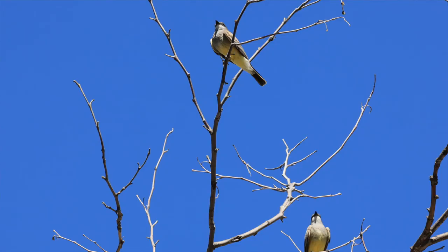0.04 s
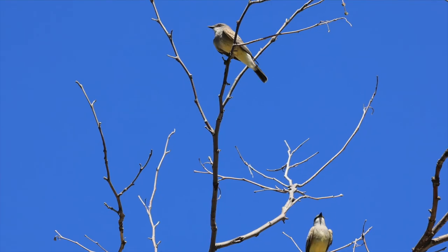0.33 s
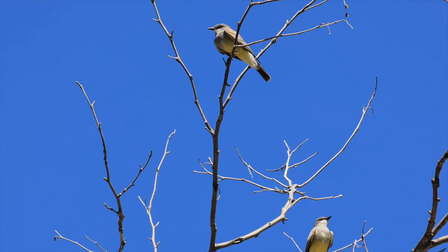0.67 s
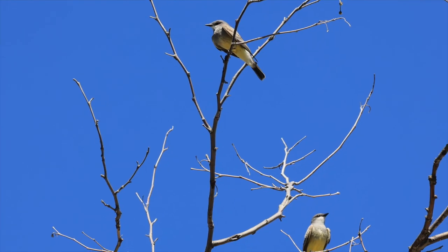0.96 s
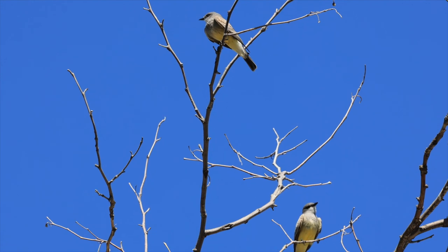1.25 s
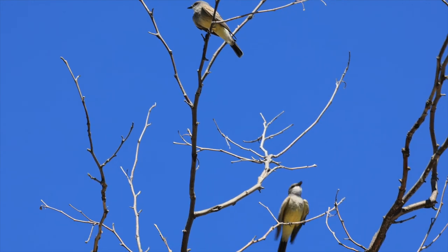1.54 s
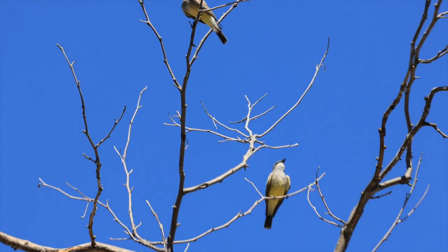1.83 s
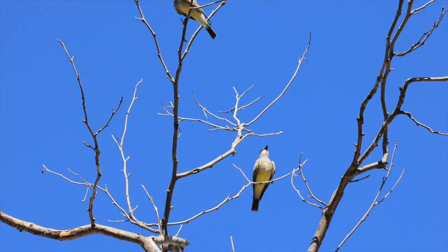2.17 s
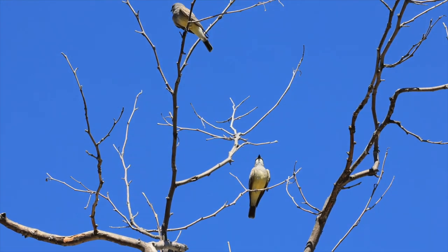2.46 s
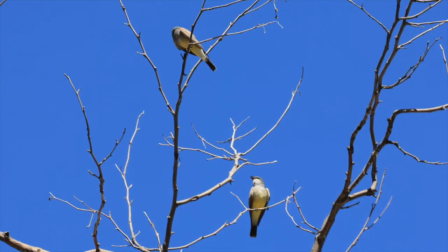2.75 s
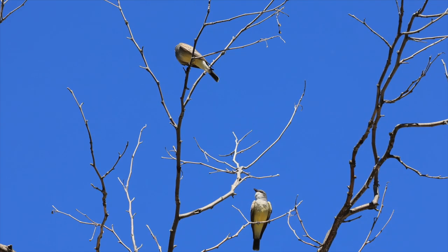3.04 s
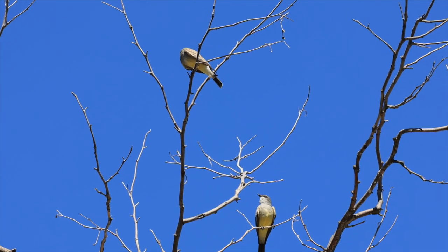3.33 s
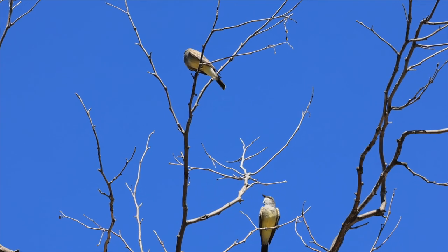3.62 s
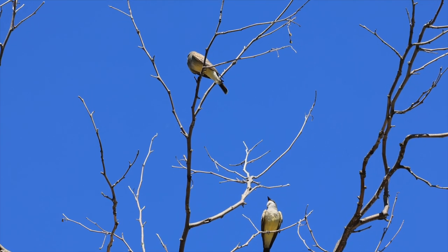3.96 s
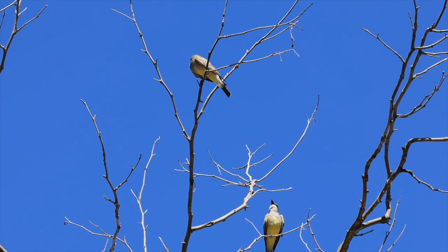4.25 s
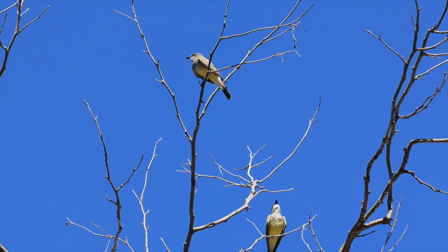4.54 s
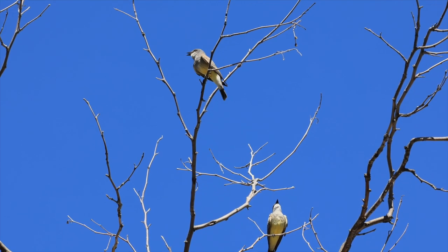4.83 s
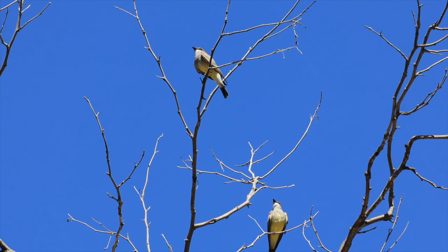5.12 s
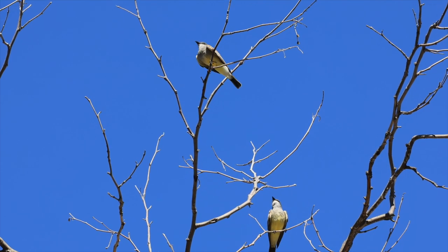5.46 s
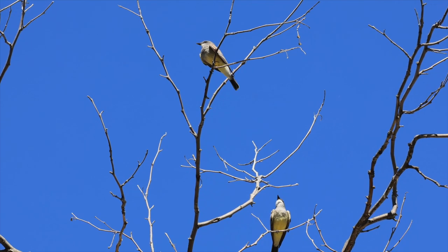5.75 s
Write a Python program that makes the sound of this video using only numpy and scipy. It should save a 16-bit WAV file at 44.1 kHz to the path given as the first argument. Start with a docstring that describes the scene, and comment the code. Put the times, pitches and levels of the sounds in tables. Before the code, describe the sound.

Birds give nasal falling whines, short chips and two quick bursts of sweeping, buzzy chatter outdoors, over distant traffic and a faint low hum.

```python
"""Kingbirds in a bare tree

Kingbirds give nasal falling whines, soft pips, trilled chips and two bursts of chatter (a rising trill,
two sweeps, a buzz), the first ending in a scream. Each note is one syrinx tone filtered by throat and
beak, with faint echoes. Small birds twitter and whistle far off, over distant traffic and a low hum.
The whole sound dips for about a second, and gain control lowers the background after each loud call."""
import sys
import numpy as np
from scipy import signal
from scipy.fft import rfft, irfft, next_fast_len
from scipy.io import wavfile
from scipy.ndimage import uniform_filter1d

SR = 44100
rng = np.random.default_rng(int(sys.argv[2]) if len(sys.argv) > 2 else 0)


def put_to_file(sound):
    """Save the sound as 16-bit audio at rate SR, in the file named by the first command-line argument."""
    columns = np.atleast_2d(sound).T  # one column per channel
    safe = np.clip(columns, -1, 1)
    whole_steps = np.round(safe * 32767)
    wavfile.write(sys.argv[1], SR, whole_steps.astype(np.int16))


N = 264159
TIME = np.arange(N) / SR
CHATTER_TRILL_HZ = 141.2

# Throat and beak response for pips and chips: f/Hz, gain/dB
CHIP_THROAT = [(900, -12), (1400, -6), (1900, 0.5), (2400, 4), (3000, 1.5), (3600, -6.5), (4200, -16),
               (4750, -26), (5500, -28.5), (6300, -41), (8000, -37), (9400, -20), (11000, -33),
               (12800, -25.5)]
# Spectrum of the low rumble: f/Hz, level/dB
RUMBLE_SPECTRUM = [(25, -20), (55, 5), (75, 9), (100, 3.5), (130, 10), (170, -2.5), (220, -10.5),
                   (400, -34.5)]


def undb(db):
    """Amplitude ratio of a level in decibels."""
    return 10 ** (np.asarray(db) / 20)


def shape(x, outline):
    """Zero-phase filtering by an outline (f/Hz, gain/dB), interpolated in log frequency."""
    size = next_fast_len(len(x) + 256)
    bins_hz = np.maximum(np.fft.rfftfreq(size, 1 / SR), 1)
    hz, db = np.transpose(outline)
    gain = undb(np.interp(np.log(bins_hz), np.log(hz), db))
    return irfft(rfft(x, size) * gain, size)[:len(x)]


def noise(spectrum):
    """Filtered Gaussian noise of unit rms."""
    x = shape(rng.standard_normal(N), spectrum)
    return x / x.std()


def walk(rate, size):
    """Smooth random modulation of spread near 1, with `rate` new values a second."""
    hold = max(int(SR / rate), 1)
    steps = np.repeat(rng.standard_normal(size // hold + 1), hold)
    return np.sqrt(2) * uniform_filter1d(uniform_filter1d(steps, hold), hold)[:size]


def clock(length):
    """Seconds since the onset of a note."""
    return np.arange(int(length * SR)) / SR


def arch(t, rise_s, from_hz, top_hz, to_hz):
    """Pitch contour that climbs, rounds off and falls ever faster."""
    up = np.clip(t / rise_s, 0, 1)
    down = np.clip((t - rise_s) / max(t[-1] - rise_s, 1 / SR), 0, 1)
    return from_hz + (top_hz - from_hz) * np.sin(np.pi / 2 * up) + (to_hz - top_hz) * down ** 1.4


def slacken(t, drop_s, share):
    """Falling membrane tension lowers the pitch by a share at the end of a note."""
    return 1 - share * np.clip(1 - (t[-1] - t) / drop_s, 0, 1) ** 1.49


def syrinx(start, hz, db, depth, trill_hz, throat, jitter, shimmer_db, rasp_db, attack_s=.002,
           release_s=.0017, overtones_db=0, cavity_hz=None):
    """Source and filter: a membrane's harmonics swell and fade as they cross the throat resonances."""
    t = TIME[:len(hz)]
    order = np.arange(1, 14)[:, None]
    flutter = lambda rate: walk(rate, SR)[:len(t)]
    # a second, slower vibration swings the pitch; depth and jitter are shares of the pitch
    trill_phase = 2 * np.pi * trill_hz * t + .22 * flutter(89)
    swing = np.cos(trill_phase) - .2 * np.sin(2 * trill_phase)  # lopsided, like a saw tooth
    hz = hz * (1 + depth * swing + jitter * flutter(900) + .0018 * flutter(63))
    harmonics = np.sin(2 * np.pi * order * np.cumsum(hz) / SR) * (order * hz < SR / 2)
    harmonics *= undb(overtones_db * np.log2(np.maximum(order / 3, 1)))  # per octave above the third
    if cavity_hz is not None:  # a moving resonance lifts the harmonic that it meets
        harmonics *= 1 + undb(12.5) / (1 + ((order * hz - cavity_hz) / 540) ** 2)
    # uneven airflow leaves a rasp around each harmonic and flutters the level
    tone = shape(harmonics.sum(0) * (1 + undb(rasp_db) * flutter(2500)), throat)
    tone /= np.sqrt(uniform_filter1d(tone ** 2, size=360))
    level_db = db + 9.5 * depth * swing + shimmer_db * flutter(210)
    gate = np.sin(np.pi / 2 * np.clip(np.minimum(t / attack_s, (t[-1] - t) / release_s), 0, 1))
    return np.pad(tone * gate * undb(level_db), (int(start * SR), N))[:N]


def outdoors(x, scatter_db, t60):
    """Convolution with a few discrete reflections and a decaying tail scattered by trees and ground."""
    # Reflections from branches and ground: delay/s, level/dB
    echoes = [(.0062, -15), (.013, -21.5), (0.035, -19.5)]
    t = TIME[:SR]
    tail = noise([(1000, 17.5), (3500, 12.5), (6000, -25), (14000, -25)])[:SR]
    tail *= undb(-60 * t / t60) * (1 - np.exp(-t / .0038))
    impulse_response = undb(scatter_db) * tail / np.sqrt(np.sum(tail ** 2))
    for delay, db in echoes:
        impulse_response[int(delay * SR)] += undb(db)
    return x + signal.fftconvolve(x, impulse_response)[:N]


def traffic():
    """Broadband noise of distant traffic fades in, then weakens slowly as it recedes."""
    # Traffic spectrum: f/Hz, level/dB
    spectrum = [(30, -8), (70, 1.5), (130, 3.5), (250, -1), (500, -2.5), (850, -0.5), (1200, -4),
                (1600, -10.5), (2200, -20.5), (3200, -31), (5000, -35), (12000, -39.5)]
    level_db = -28.5 - .57 * TIME - 4 * np.maximum(1 - TIME / .2, 0)
    return noise(spectrum) * undb(level_db + .5 * walk(11, N))


def rumble():
    """Low-frequency noise under slow random amplitude modulation."""
    return noise(RUMBLE_SPECTRUM) * undb(-37.5 + 1.5 * walk(5.08, N))


def mains_hum(hz=118.3):
    """One sinusoid, wavering in phase and amplitude."""
    phase = 2 * np.pi * hz * TIME + .62 * walk(4.41, N)
    return np.sqrt(2) * np.sin(phase) * undb(-41 + 2 * walk(2.4, N))


def microphone_hiss():
    """Stationary broadband self-noise."""
    return noise([(1000, 5.5), (6000, -4), (13000, 0)]) * undb(-53.5)


def whistle(start, length, from_hz, to_hz, waver):
    """A pure tone on an unsteady exponential glide, under a half-sine envelope."""
    out = np.zeros(N)
    span = (TIME > start) & (TIME < start + length)
    progress = (TIME[span] - start) / length
    hz = from_hz * (to_hz / from_hz) ** progress * (1 + waver * walk(400, SR)[:len(progress)])
    out[span] = np.sin(np.pi * progress) * np.sin(2 * np.pi * np.cumsum(hz) / SR)
    return out


def far_twitter():
    """A small bird pairs pure-tone glides: a steep down-sweep, then a louder, slightly falling note."""
    # Syllables: t/s, sweep level/dB, centre f/Hz of the second note
    syllables = [(.315, -56, 4460), (.425, -52, 4510), (.53, -52.5, 4470), (.635, -54, 4530),
                 (.735, -53, 4500), (0.832, -51, 4580), (0.926, -49, 4600), (1.029, -48.5, 4530),
                 (1.135, -49.5, 4640), (1.23, -48.5, 4570), (1.322, -49.5, 4500), (1.415, -48, 4440),
                 (1.49, -51.5, 4460)]
    out = np.zeros(N)
    for start, db, hz in syllables:
        sweep = whistle(start - .002, .026, 6100, 3400, waver=.0113)
        note = whistle(start + .022, .04, hz * 1.03, hz / 1.03, waver=.018)
        out += undb(db) * (sweep + undb(4) * note)
    return out


def far_whistles():
    """Other small birds give faint falling tones with random frequency modulation."""
    # Whistles: t/s, length/s, first f/Hz, last f/Hz, level/dB
    notes = [(1.348, 0.25, 3800, 3590, -54.5), (1.69, .3, 6300, 6250, -54), (2.05, .17, 3650, 3630, -53),
             (2.25, 0.27, 6900, 6880, -54), (2.355, .08, 5300, 4600, -48), (2.437, 0.12, 4380, 3900, -49.5),
             (2.574, 0.044, 4050, 3970, -43)]
    return sum(undb(db) * whistle(*glide, waver=.028) for *glide, db in notes)


def whines():
    """Formants make a nasal note that climbs, steps down, sags and drops; level follows pitch."""
    # Whines: t/s, length/s, rise/s, settling/s, drop/s, top f/Hz, held f/Hz, sag/(Hz/s), level/dB,
    # onset trill depth/share of pitch, overtone slope/(dB/octave)
    notes = [ (1.563, .332, .072, .046, .028, 1222, 1121, 510, -19.5, 0.068, -6.5),
             (2.852, 0.34, .066, .041, 0.028, 1432, 1292, 850, -14, 0.028, -1),
             (3.798, .28, .081, .029, 0.029, 1505, 1285, 506, -13.5, 0.045, 0)]
    # Nasal throat and beak response: f/Hz, gain/dB
    throat = [(900, -11), (1400, -12.5), (1900, -9.5), (2400, 1), (3000, -0.5), (3600, -2), (3900, -13),
              (4300, -25), (5000, -33.5), (6000, -37), (8000, -50), (9800, -21.5), (11500, -35.5),
              (14000, -40)]
    out = np.zeros(N)
    for start, length, rise_s, settle_s, drop_s, top_hz, held_hz, sag, db, trill, slope_db in notes:
        t = clock(length)
        climb_left = np.maximum(1 - t / rise_s, 0)
        past_top_s = np.maximum(t - rise_s, 0)
        step_hz = (top_hz - held_hz) * (1 - np.exp(-(past_top_s / settle_s) ** 3))
        hz = arch(t, rise_s, .655 * top_hz, top_hz, top_hz) - step_hz - sag * past_top_s
        quaver = 1 + .0055 * walk(70, SR)[:len(t)]
        hz *= slacken(t, drop_s, share=.22) * quaver
        level_db = db + 16.5 * np.log2(hz / top_hz) - 13 * past_top_s - 3 * climb_left
        out += syrinx(start, hz, level_db, depth=.0013 + trill * climb_left, trill_hz=144,
                      throat=throat, jitter=.002, shimmer_db=.9, rasp_db=-58,
                      attack_s=.0068, release_s=.0087, overtones_db=slope_db)
    return out


def drone():
    """A low band of noise swells under half-sine envelopes."""
    # Swells: t/s, length/s, level/dB
    swells = [(1.77, 0.25, -19.5), (1.93, 0.53, -19.5), (2.525, 0.12, -26.5)]
    # Drone spectrum: f/Hz, level/dB
    spectrum = [(70, -18), (110, -3), (135, 2), (175, 4), (205, -20), (260, -68)]
    envelope = sum(undb(db) * np.sin(np.pi * np.clip((TIME - start) / length, 0, 1))
                   for start, length, db in swells)
    return (noise(spectrum) + undb(-16) * noise(RUMBLE_SPECTRUM)) * envelope


def far_buzz():
    """Strong noise modulation makes a hoarse note; distance attenuates its treble."""
    # Hoarse call: t/s, length/s, top f/Hz, level/dB, trill rate/Hz
    notes = [(2.592, 0.16, 1763, -34.5, 121.7)]
    # Throat and beak response, dulled by distance: f/Hz, gain/dB
    throat = [(1300, 1), (1800, 0), (2300, -4.5), (3500, -17), (5000, -35), (9000, -52)]
    start, length, top_hz, db, trill_hz = notes[0]
    hz = arch(clock(length), .0313, .94 * top_hz, top_hz, .97 * top_hz)
    return syrinx(start, hz, db, depth=.076, trill_hz=trill_hz, throat=throat,
                  jitter=.0184, shimmer_db=-1, rasp_db=-1.5, attack_s=.017)


def pips():
    """Soft, untrilled pitch arches that decay exponentially."""
    # Pips: t/s, length/s, top f/Hz, level/dB, pitch at both ends/share of top
    notes = [(2.708, .03, 936, -40, .97), (3.65, 0.04, 1047, -43.5, 0.9), (4.375, 0.047, 1118, -24, 0.8),
             (5.278, 0.067, 972, -40.5, 0.95), (5.446, 0.042, 985, -38, 0.92)]
    out = np.zeros(N)
    for start, length, top_hz, db, ends in notes:
        t = clock(length)
        hz = arch(t, .354 * length, ends * top_hz, top_hz, ends * top_hz)
        out += syrinx(start, hz, db - 102 * t, depth=0, trill_hz=0, throat=CHIP_THROAT,
                      jitter=.0056, shimmer_db=-2, rasp_db=-24, attack_s=.0096, release_s=.017)
    return out


def chips():
    """Short frequency-modulated arches that flick down as the membrane slackens."""
    # Chips: t/s, length/s, top f/Hz, level/dB, trill depth/share of pitch, trill rate/Hz
    notes = [ (2.768, 0.04, 1240, -25, 0.036, 121), (3.504, 0.05, 1212, -33.5, 0.12, 111.7),
             (3.689, 0.079, 1480, -19, 0.059, 122.8), (4.267, .06, 1390, -18.5, 0.062, 118),
             (5.32, .053, 1270, -24.5, .06, 124.3), (5.881, 0.099, 1513, -22.5, 0.095, 140)]
    out = np.zeros(N)
    for start, length, top_hz, db, depth, trill_hz in notes:
        t = clock(length)
        hz = arch(t, .35 * length, .89 * top_hz, top_hz, .93 * top_hz)
        hz *= slacken(t, drop_s=.25 * length, share=.18)
        level_db = db - 53 * np.maximum(t - length / 2, 0)
        out += syrinx(start, hz, level_db, depth, trill_hz, CHIP_THROAT,
                      jitter=.009, shimmer_db=1.3, rasp_db=-20, attack_s=.032, release_s=.005)
    return out


def rising_trills(throat):
    """A climb opens each burst of chatter, its frequency modulation deepest midway through the rise."""
    # Trills: t/s, length/s, rise/s, top f/Hz, level/dB
    notes = [(4.466, .084, .066, 1966, -14.5), (5.518, 0.093, .084, 1922, -16)]
    out = np.zeros(N)
    for start, length, rise_s, top_hz, db in notes:
        t = clock(length)
        hz = arch(t, rise_s, 1370, top_hz, top_hz) * slacken(t, drop_s=.011, share=.32)
        depth = .015 + .088 * np.sin(np.pi * np.minimum(t / rise_s, 1))
        out += syrinx(start, hz, db, depth, CHATTER_TRILL_HZ, throat, jitter=.003, shimmer_db=.86,
                      rasp_db=-20.5, attack_s=.037, release_s=.0021, overtones_db=2)
    return out


def sweeps(throat):
    """Steep, barely modulated pitch arches whose level peaks with their frequency."""
    # Sweeps: t/s, length/s, rise/s, top f/Hz, last f/Hz, level/dB
    notes = [ (4.576, 0.04, 0.025, 1720, 1214, -12.5), (4.618, 0.072, 0.014, 1842, 1452, -12.5),
             (5.644, .046, 0.028, 1715, 1164, -14), (5.689, .068, .018, 1856, 1420, -12.5),
             (5.854, 0.019, 0.0052, 1480, 1110, -30)]
    out = np.zeros(N)
    for start, length, rise_s, top_hz, to_hz, db in notes:
        hz = arch(clock(length), rise_s, 1200, top_hz, to_hz)
        level_db = db - 30 * np.log2(hz / top_hz) ** 2
        out += syrinx(start, hz, level_db, depth=.0031, trill_hz=CHATTER_TRILL_HZ, throat=throat,
                      jitter=.0059, shimmer_db=.55, rasp_db=-27, attack_s=.0017, release_s=.00065)
    return out


def buzzes():
    """Fast, deep frequency modulation splits each harmonic into sidebands."""
    # Buzzes: t/s, length/s, top f/Hz, level/dB, modulation rate/Hz
    notes = [(4.686, .098, 1670, -22.5, 295), (4.81, .085, 1604, -30.5, 303),
             (5.756, .094, 1687, -20, 314.5)]
    # Throat and beak response: f/Hz, gain/dB
    throat = [(1100, -1), (1600, -2.5), (2000, 7.5), (2400, 12), (3000, 5), (3700, -0.5), (4200, -14),
              (5000, -26), (7400, -31), (9000, -6.5), (10300, -33), (11500, -29), (14000, -32)]
    out = np.zeros(N)
    for start, length, top_hz, db, trill_hz in notes:
        hz = arch(clock(length), .055, .82 * top_hz, top_hz, .94 * top_hz)
        out += syrinx(start, hz, db, depth=.17, trill_hz=trill_hz, throat=throat,
                      jitter=.008, shimmer_db=1.3, rasp_db=-22, release_s=.01)
    return out


def scream(start=4.779, length=.334, cavity_jump_s=4.827):
    """The voice cracks, slides down and fades while the throat cavity's resonance tracks a harmonic."""
    # Pitch contour: t/s, f/Hz
    contour = [(4.795, 1702), (4.815, 1686), (4.837, 1424), (4.859, 1283), (4.879, 1182), (4.947, 1091),
               (5.059, 986), (5.083, 880), (5.1, 804.3)]
    # Throat response with the beak wide open: f/Hz, gain/dB
    throat = [(900, -8), (1700, -4), (2200, -3.5), (2700, -7.5), (3400, -2), (4100, -6.5), (4600, -9.5),
              (5200, -10.5), (5800, -23), (7000, -23), (8200, -37), (9800, -25), (10700, -17.5),
              (11800, -27), (13500, -27)]
    t = clock(length)
    crack = np.sqrt(np.maximum(1 - t / .0155, 0))  # the onset is too high and rough
    slide_hz = np.interp(start + t, *np.transpose(contour))
    hz = slide_hz * (1 + .24 * crack)
    level_db = -10 + 5.5 * np.log2(slide_hz / slide_hz[0]) - 53 * t
    tracked_harmonic = 2 + np.clip((start + t - cavity_jump_s) / .005 + .5, 0, 1)
    depth = .09 * crack + .018 * np.exp(-t / .19)
    slope_db = 1 - 17 * t  # the overtones dull as the beak closes
    return syrinx(start, hz, level_db, depth, trill_hz=170, throat=throat, jitter=.0027,
                  shimmer_db=-.3, rasp_db=-21, attack_s=.016, release_s=.025,
                  overtones_db=slope_db, cavity_hz=hz * tracked_harmonic)


def chatter():
    """Two bursts of quick notes, in which trills and sweeps pass through the same formants."""
    # Bright throat and beak response: f/Hz, gain/dB
    throat = [(1100, 0), (1600, -11), (1950, -1.5), (2400, 8), (3200, 1.5), (3800, -1.5), (4300, -18),
              (4900, -31), (5500, -27.5), (6200, -36.5), (7700, -39), (9200, -17.5), (11300, -34.5),
              (12900, -38)]
    return rising_trills(throat) + sweeps(throat) + buzzes() + scream()


def gain_control(x, threshold_db=-22.5, ratio=2.75, recovery_db_per_s=11.5):
    """Compression: the gain falls at once above the threshold and recovers slowly."""
    level_db = 10 * np.log10(np.abs(uniform_filter1d(x ** 2, size=256)) + 1e-12)
    reduction_db = np.maximum(level_db - threshold_db, 0) * (1 - 1 / ratio)
    recovery_db = recovery_db_per_s * TIME
    return x * undb(recovery_db - np.maximum.accumulate(reduction_db + recovery_db))


def scene():
    """Superposition at one microphone; the small far birds carry the larger share of scattered sound."""
    small_birds = far_twitter() + far_whistles()
    kingbirds = chatter() + whines() + chips() + pips() + far_buzz()
    birds = outdoors(kingbirds, scatter_db=-20.5, t60=.37) + outdoors(small_birds, scatter_db=0, t60=.27)
    return (birds + traffic() + rumble() + mains_hum() + drone() + microphone_hiss())[None]


def record(dry):
    """Treble roll-off, a level dip of about a second, compression and a steep low-pass, in that order."""
    # Microphone roll-off: f/Hz, gain/dB
    microphone = [(12800, -0.5), (13500, -5.5), (14200, -12), (15000, -22)]
    # Dip in level: t/s, gain/dB
    dip = [(1.55, 0), (1.575, -8), (1.6, -27), (2.445, -27), (2.47, -11), (2.5, 0)]
    dip_gain = undb(np.interp(TIME, *np.transpose(dip)))
    heard = gain_control(shape(dry[0], microphone) * dip_gain)
    low_pass = signal.ellip(10, .2, 70, 15000, fs=SR, output="sos")
    return signal.sosfilt(low_pass, heard)[None]


dry = scene()
out = record(dry)
put_to_file(out)
```